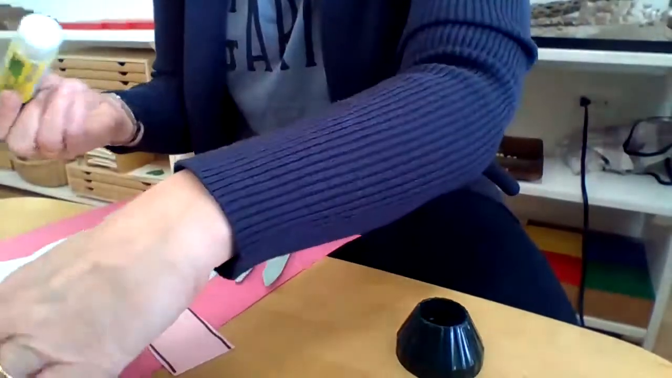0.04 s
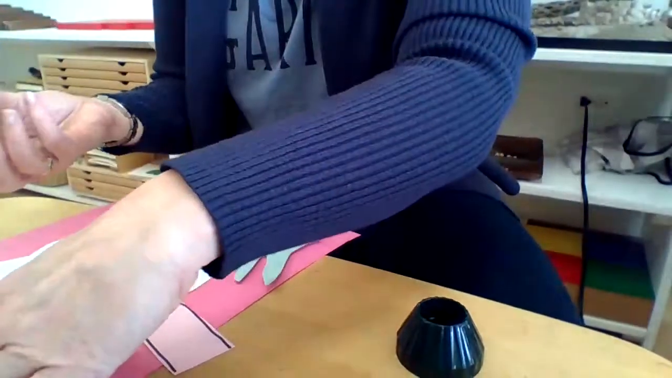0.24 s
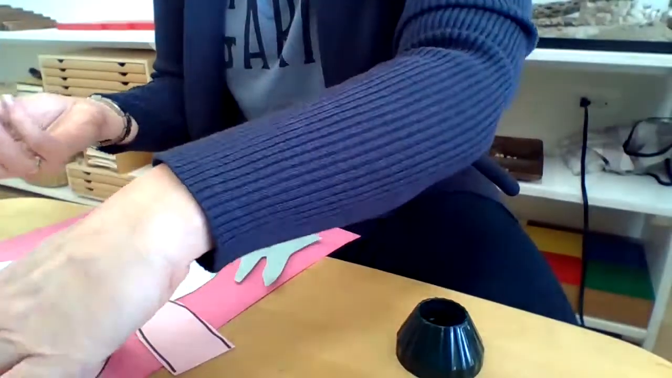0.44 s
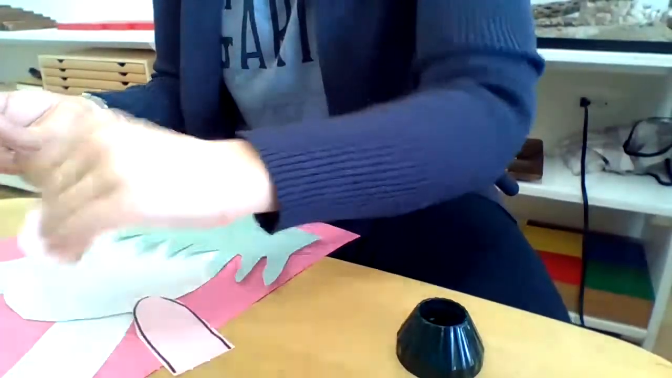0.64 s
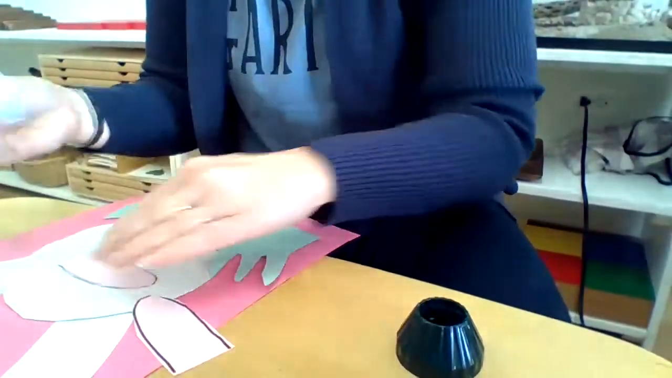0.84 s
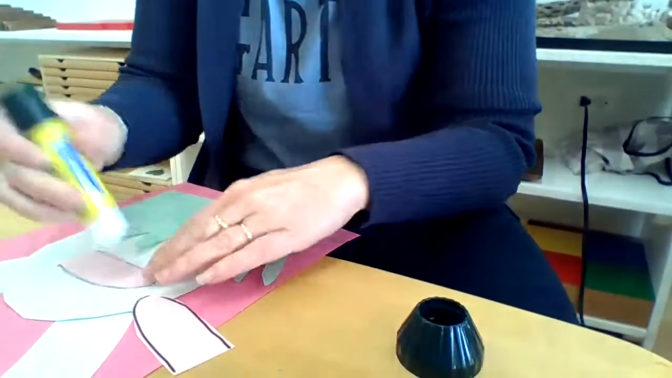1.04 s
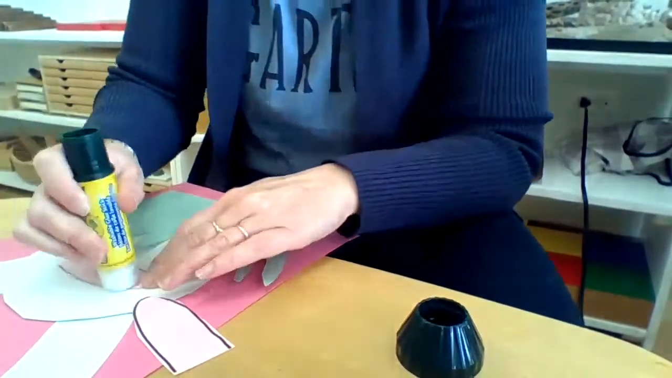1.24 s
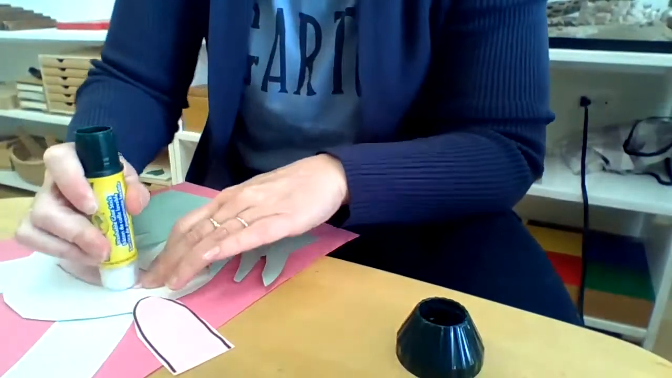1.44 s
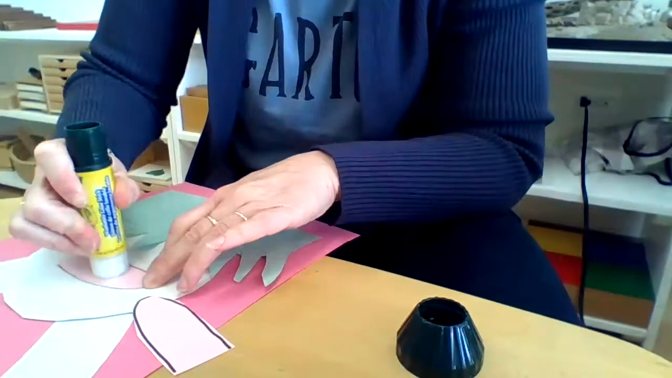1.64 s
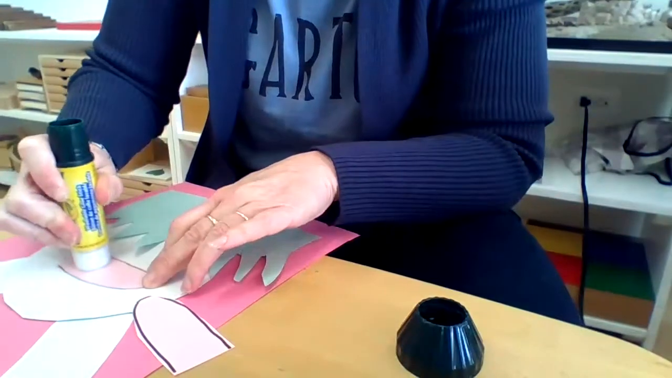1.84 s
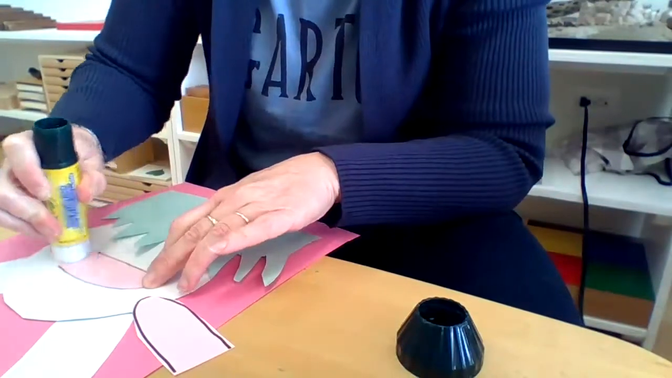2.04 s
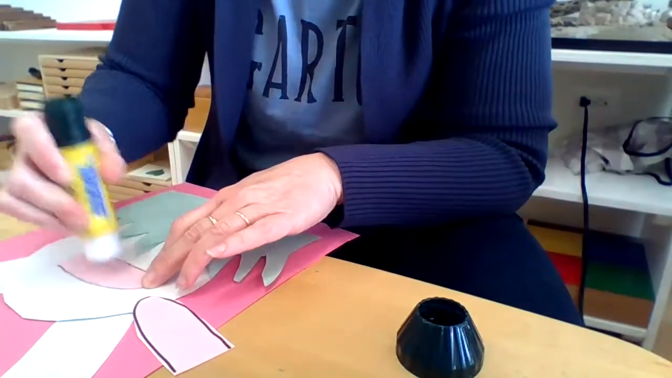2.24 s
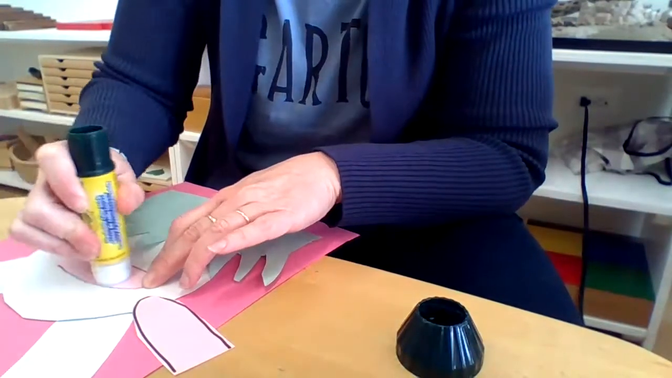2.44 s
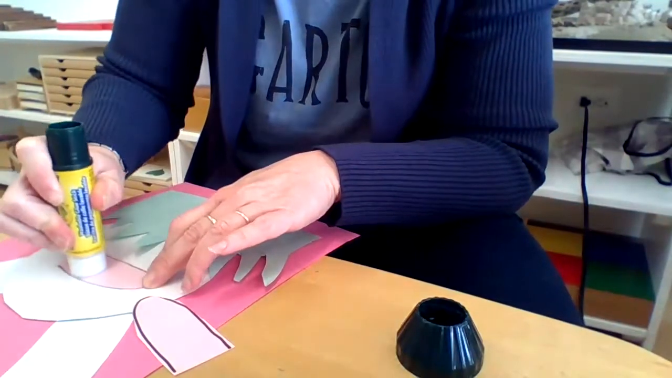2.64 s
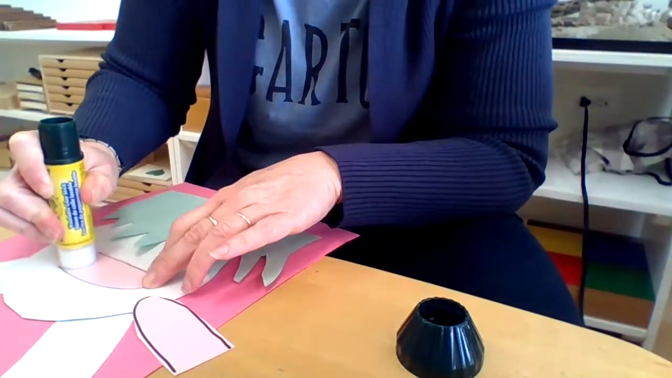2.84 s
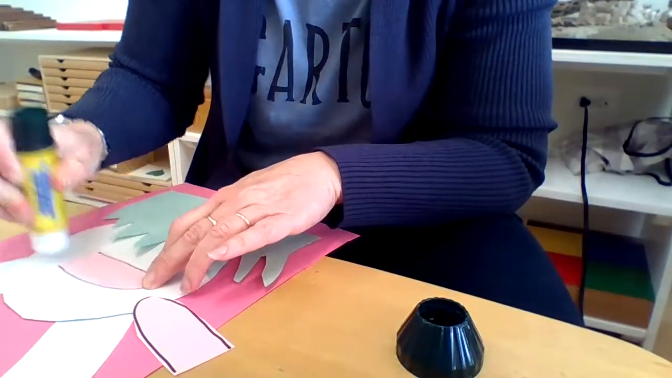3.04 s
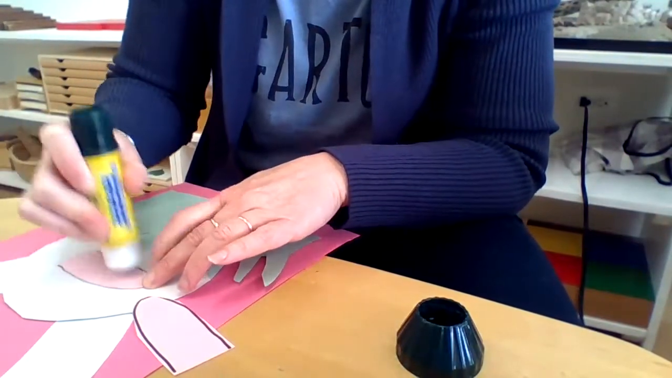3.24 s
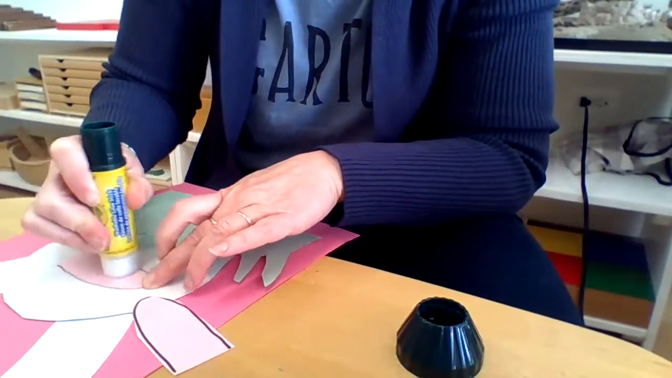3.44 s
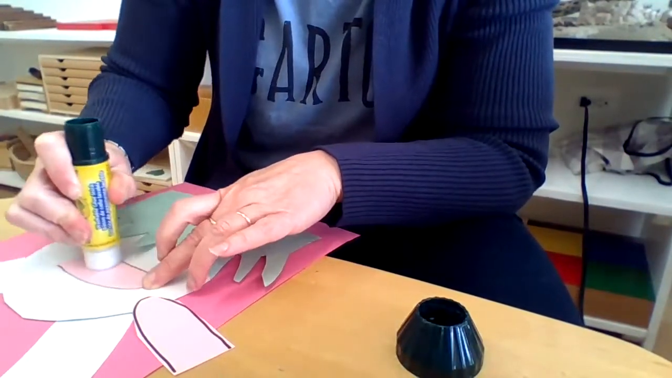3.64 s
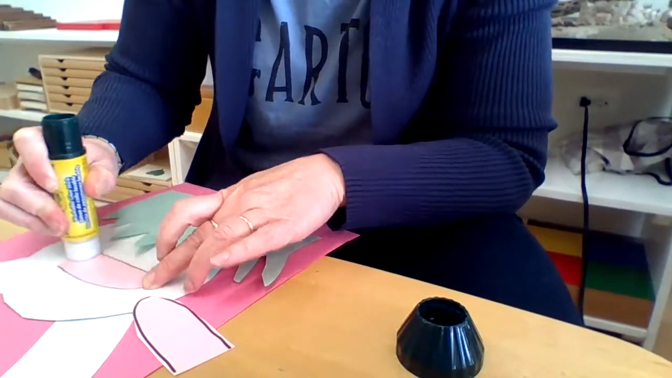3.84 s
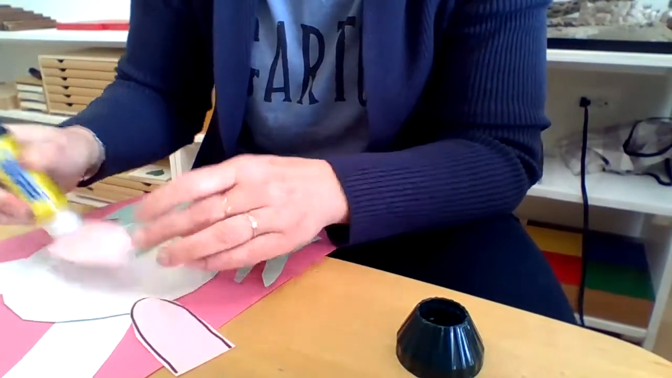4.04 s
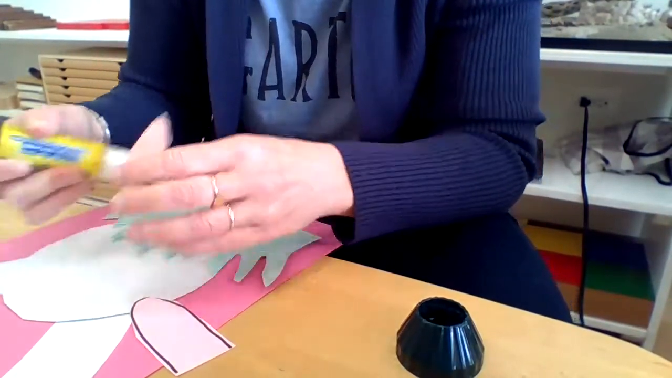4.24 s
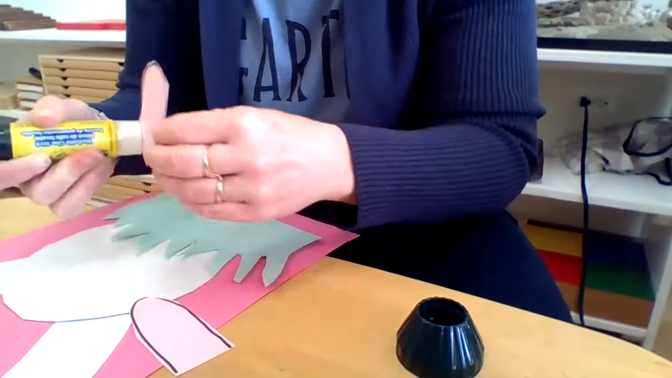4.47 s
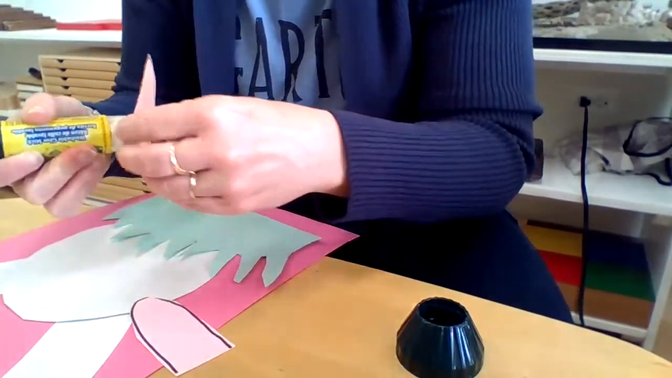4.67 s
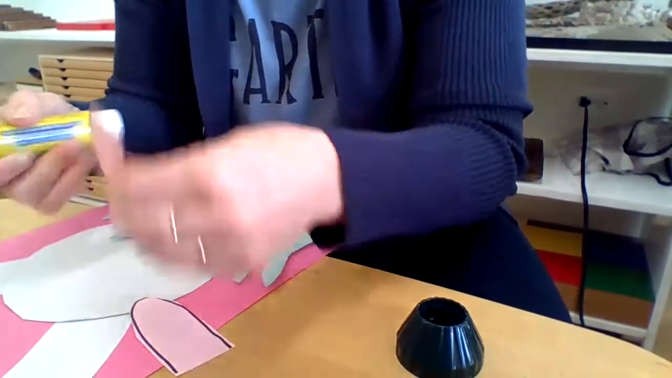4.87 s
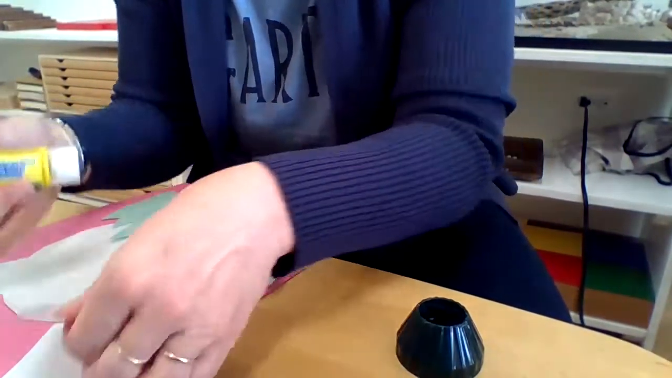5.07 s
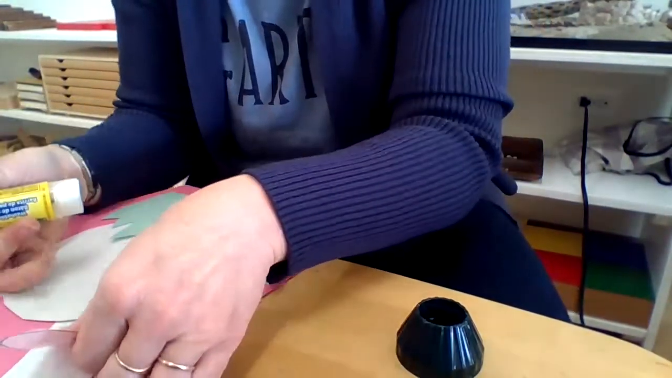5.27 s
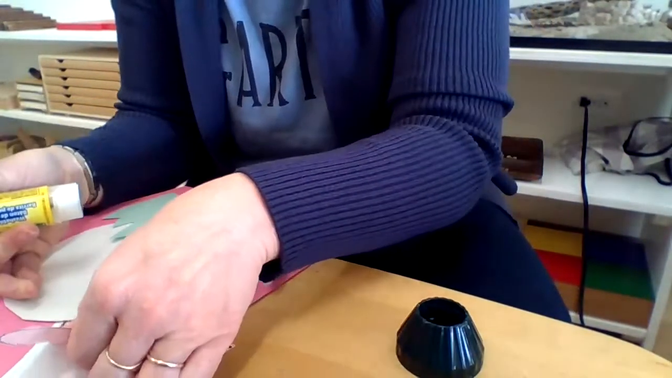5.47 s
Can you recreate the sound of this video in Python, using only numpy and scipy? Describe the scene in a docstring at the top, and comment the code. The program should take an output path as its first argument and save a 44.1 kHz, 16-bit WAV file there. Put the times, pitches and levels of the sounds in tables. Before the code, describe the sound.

Close up in a small, quiet room, paper rasps and ticks as a hand smooths it on a wooden table. Three sharp, briefly ringing knocks follow as a glue stick lands on the paper, with a few dull rubbing strokes after the first. A piece of paper snaps free, and faint slides and a soft bump finish. A low rumble and very faint electronic whine lie underneath.

```python
"""Glue stick on construction paper

A hand smooths paper on a wooden table, close up; slipping fibres shake the top, rasp and hiss.
The stick knocks three times, ringing the table's modes, and smears glue between soft bumps.
The paper ticks as it buckles; the glued piece snaps free and is pressed in place.
A small room, with a low rumble and a faint electronic whine."""
import sys
import numpy as np
from scipy import signal
from scipy.fft import rfft, irfft
from scipy.io import wavfile
from scipy.ndimage import uniform_filter1d

SR = 44100
rng = np.random.default_rng(int(sys.argv[2]) if len(sys.argv) > 2 else 0)


def log_audio(samples):
    """Write samples as a 16-bit WAV file to the path given in sys.argv[1]."""
    # one column per channel
    frames = np.atleast_2d(samples).T
    # limit to full scale, then quantise
    limited = np.clip(frames, -1, 1)
    pcm = np.round(limited * 32767).astype(np.int16)
    wavfile.write(sys.argv[1], SR, pcm)


N = 242991

# table-top modes: (frequency [Hz], level [dB], t60 [s])
TABLE_MODES = [(145.5, -21.5, 0.2), (213.3, -15.5, 0.22), (234, -37.5, 0.39), (262.5, -34, 0.38),
               (292, -22, .24), (326.3, -15, 0.22), (353, -30.5, .075), (425.6, -9, 0.11),
               (441.6, -17, 0.084), (543.2, -32, 0.22), (572.4, -21, .05), (636, -21, 0.1),
               (688.3, -7, 0.077), (765, -23, 0.066), (820, -33.5, 0.13), (1106, -33, .1),
               (1340, -27, 0.042), (1415, -15.5, 0.02), (1464, -29.5, .02), (2050, -14.5, 0.022),
               (2248, -18.5, 0.013), (2450, -39.5, 0.018)]


def knocks(touch_db=-17, touch_crack_db=-14, lead_s=0.002, baffle_hz=135):
    """Soft glue touches first, then the stick hits home with a crack; lighter bumps fall around these."""
    # stick landings: (time [s], blow [dB], contact [ms], crack [dB])
    landings = [(1.3132, -0.5, 1.47, -16), (2.4515, -0.53, 0.84, -13.5), (3.402, 0, 0.6, -13.5)]
    # soft bumps of stick and fingers: (time [s], blow [dB], contact [ms])
    bumps = [(.263, -23.5, 3.6), (1.446, -31, 0.72), (1.742, -33.5, 0.91), (2.133, -33, 0.54),
             (2.153, -31, 4.4), (3.059, -39.5, 1.06), (3.774, -35, 0.64), (3.858, -39, 0.96),
             (4.073, -29, 2.9), (5.289, -21, 3.23)]
    # crack spectrum: (frequency [Hz], relative level [dB])
    crack_spectrum = [(300, -30.5), (850, -1.5), (1150, -2), (1500, 11.5), (1850, -1.5), (2300, 3),
                      (2700, -7), (3200, -6), (4200, -13.5), (8000, -19), (12500, -19.5), (16000, -18.5)]
    out, modes = np.zeros(N), table_modes()
    for start_s, db, contact_ms, crack_db in landings:
        ring = gain_of(db) * blow(modes, contact_ms, baffle_hz)
        crack = gain_of(crack_db) * burst(lambda hz: curve_at(crack_spectrum, hz), decay_ms=1.5, spike=1.8)
        add(out, start_s - lead_s, -gain_of(touch_db) * ring)
        add(out, start_s - lead_s, gain_of(touch_crack_db) * crack)
        add(out, start_s, ring)
        add(out, start_s, crack)
    for start_s, db, contact_ms in bumps:
        low_cut_hz = 0.4 * 1000 / contact_ms  # modes under 0.4 cycle per contact barely move
        add(out, start_s, gain_of(db) * blow(modes, contact_ms, low_cut_hz))
    return highpass(out, baffle_hz)  # air slips round the board: deep bass does not radiate


def table_modes(rise_ms=0.87, travel_ms=0.48, size=20000):
    """Free ring of the table top, one row per mode."""
    hz, db, t60_s = np.transpose(TABLE_MODES)[:, :, None]
    arrival_ms = np.maximum(travel_ms * (np.sqrt(700 / hz) - 1), 0)  # low bending waves travel slower
    t = np.maximum(np.arange(size) / SR - arrival_ms / 1000, 0)
    rise = 1 - np.exp(-t * 1000 / rise_ms)
    return gain_of(db) * rise * np.sin(2 * np.pi * hz * t) * np.exp(-np.log(1000) * t / t60_s)


def blow(modes, contact_ms, low_cut_hz):
    """A long contact omits the high modes; a glancing touch omits the low ones."""
    contact_cycles = np.array(TABLE_MODES)[:, 0] * contact_ms / 1000
    drive = 1 / (1 + contact_cycles ** 4)
    return highpass(drive @ modes, low_cut_hz)


def glue_smears():
    """Glue over paper: weight shakes the table; hiss follows speed, rasp follows it steeply."""
    # stick strokes: (start [s], end [s], speed [dB], weight [dB])
    smears = [(1.44, 1.51, -7.5, -0.5), (1.546, 1.675, -6.5, -5.5), (1.743, 1.935, 0, -5.5),
              (2.104, 2.2, -7.5, -5), (2.618, 2.695, -22, -15.5), (4.006, 4.07, -11, -10)]
    # table murmur, sheet rasp and hiss spectra: (frequency [Hz], relative level [dB])
    murmur = [(80, -28), (150, 1.5), (220, 4.5), (330, -3), (430, 4.5), (560, -22.5), (640, -9), (695, 8.5),
              (760, -10.5), (900, -5.5), (1200, -50)]
    rasp = [(600, -20), (1000, -6), (1150, -8.5), (1420, 4.5), (1750, -7), (2150, 4.5), (2500, -6),
            (3000, -23), (4500, -26.5)]
    hiss = [(1500, -25.5), (3000, -5), (4000, -4.5), (5000, 0), (6300, -12), (7600, -8), (9500, -14),
            (12000, -8.5), (16000, -17)]
    tilt_db_per_oct = 0.5
    strokes = [(start_s, end_s, -47 + weight_db, -52 + 2.5 * speed_db, -66 + speed_db, tilt_db_per_oct)
               for start_s, end_s, speed_db, weight_db in smears]
    return friction(strokes, murmur, rasp, hiss,
                    slips_per_s=1700, spread_db=-1.5, steady=0.5, taper=0.49, patchy_db=0.5)


def hand_slides():
    """Hand and paper over paper: weight shakes the table, speed makes hiss, both make the sheet rasp."""
    # hand strokes: (start [s], end [s], speed [dB], weight [dB], hiss tilt [dB/octave])
    slides = [(0, 0.194, -19, -22.5, 3), (0.15, 0.268, -9, -0.5, 3), (0.248, 0.423, -21.5, -12, 0.5),
              (.42, 0.481, -8.5, -18.5, 4.5), (0.516, 0.579, -18, -11.5, 2), (0.561, .594, 0, -13.5, -0.5),
              (.594, .661, -3.5, -18, 1), (0.649, 0.94, -17.5, -21, 3), (4.098, 4.159, -22, -23, -7),
              (4.535, 4.598, -15.5, -22.5, -4), (4.878, 4.906, -11.5, -14, -2.5),
              (5.205, 5.307, -12.5, -17, -0.5), (5.301, 5.413, -13, -20.5, -.5),
              (5.388, 5.494, -22.5, -25, -3)]
    # table murmur, sheet rasp and hiss spectra: (frequency [Hz], relative level [dB])
    murmur = [(80, -36), (135, -1), (210, -2.5), (330, -6), (450, -4.5), (560, -14), (720, -11.5),
              (950, -16.5), (1300, -62.5)]
    rasp = [(600, -14), (1000, -7.5), (1400, 8), (1800, -3.5), (2200, 2.5), (3000, -14), (4500, -53)]
    hiss = [(1500, -39), (3000, 3.5), (4500, 7), (6500, 6.5), (9000, 2), (13000, 3.5), (16000, -3)]
    strokes = []
    for start_s, end_s, speed_db, weight_db, tilt_db_per_oct in slides:
        rasp_db = -45.5 + 0.8 * speed_db + 0.48 * weight_db
        strokes.append((start_s, end_s, -44 + weight_db, rasp_db, -45 + speed_db, tilt_db_per_oct))
    return friction(strokes, murmur, rasp, hiss,
                    slips_per_s=2400, spread_db=2.5, steady=0.24, taper=0.51, patchy_db=3.5)


def friction(strokes, murmur, rasp, hiss, slips_per_s, spread_db, steady, taper, patchy_db, size=16384):
    """Fibres catch and slip under each stroke: they shake the table, rasp in the sheet, hiss in air."""
    out = np.zeros(N)
    for start_s, end_s, murmur_db, rasp_db, hiss_db, tilt_db_per_oct in strokes:
        slip_db = spread_db * np.minimum(rng.exponential(1, size), 4)
        kicks = gain_of(slip_db) * rng.choice([-1, 1], size)
        slipping = rng.random(size) < slips_per_s / SR
        slips = unit_rms(kicks * slipping) + steady * rng.standard_normal(size)
        flexed = sheet_flex(slips, patchy_db)
        tilted_hiss = [(hz, db + tilt_db_per_oct * np.log2(hz)) for hz, db in hiss]
        paths = [(murmur_db, coloured(slips, murmur)),
                 (rasp_db, coloured(flexed, rasp)),
                 (hiss_db, coloured(flexed, tilted_hiss))]
        length = min(round((end_s - start_s) * SR), size)
        swell = np.sin(np.linspace(0, np.pi, length)).clip(0) ** taper
        add(out, start_s, swell * sum(gain_of(db) * unit_rms(path[:length]) for db, path in paths))
    return out


def sheet_flex(x, patchy_db):
    """The sheet flexes under the stroke, so its colour shifts in patches."""
    spectra = signal.stft(x, SR, nperseg=256)[2]
    patches = uniform_filter1d(rng.standard_normal(spectra.shape), size=6, axis=0)
    patches = uniform_filter1d(patches, size=8, axis=1)
    return signal.istft(spectra * gain_of(patchy_db * unit_rms(patches)), SR)[1][:len(x)]


def paper_snaps(decay_cycles=2.5):
    """Stiff paper buckles or comes unstuck in single ticks; low ones last longer."""
    # ticks: (time [s], level [dB], centre [Hz], width [octaves])
    ticks = [(0.053, -42, 1690, 0.75), (.417, -37, 4000, 5.6), (.4609, -30, 2640, 0.5),
             (0.525, -45, 1850, 1.3), (0.6604, -30.5, 1030, 0.57), (0.827, -33, 2480, 12),
             (.870, -37.5, 1680, 2.6), (.994, -40, 2960, 3.4), (1.166, -42, 1106, 0.87),
             (3.0603, -44, 1990, 0.38), (4.0551, -19.5, 2680, 2.2), (4.103, -35.5, 2470, 1.5),
             (4.775, -46, 3000, 1.3), (4.889, -34, 4000, 3), (5.212, -45, 1340, 0.64),
             (5.465, -50.5, 1090, 1.11)]
    out = np.zeros(N)
    for start_s, db, centre_hz, width_oct in ticks:
        colour_db = lambda hz: -20 * np.log10(1 + (np.log2((hz + 1) / centre_hz) / width_oct) ** 2)
        decay_ms = decay_cycles * 1000 / centre_hz
        add(out, start_s, gain_of(db) * burst(colour_db, decay_ms, spike=4))
    return out


def burst(colour_db, decay_ms, spike, size=2048):
    """A sharp click and its dying scatter, coloured by a causal filter."""
    t = np.arange(size) / SR
    fade = np.exp(-t * 1000 / decay_ms)
    kick = rng.standard_normal(size) * fade
    kick[0] += spike
    spectrum = np.fft.fft(kick)
    ripple = np.sqrt(uniform_filter1d(abs(spectrum) ** 2, size=15, mode="wrap"))
    hz = abs(np.fft.fftfreq(size, 1 / SR))
    log_gain = np.log(gain_of(np.maximum(colour_db(hz), -70)) / ripple)  # leaves the object's own colour
    minimum_phase = np.exp(np.conj(signal.hilbert(log_gain)))
    click = np.fft.ifft(spectrum * minimum_phase).real
    return click * np.linalg.norm(fade) / np.linalg.norm(click) / 2


def near_echoes(x, echo_db=-13, decay_s=0.012, low_cut_hz=900, taps_per_s=1500):
    """Hands, body and shelves scatter the treble back within a few hundredths of a second."""
    t = np.arange(SR // 10) / SR
    taps = rng.standard_normal(len(t)) * (rng.random(len(t)) < taps_per_s / SR)
    taps *= (t > 0.002) * np.exp(-t / decay_s)
    treble = highpass(x, low_cut_hz)
    return gain_of(echo_db) * signal.fftconvolve(treble, taps / np.linalg.norm(taps))[:N]


def room(x, wet_db=-21, first_s=0.005, taps_per_s=4000):
    """Sparse reflections of random sign, each band dying at its own rate."""
    # room decay: (frequency [Hz], t60 [s])
    decay_times = [(150, 0.99), (400, 1), (1000, 0.52), (2500, 0.64), (6000, 0.2), (15000, 0.17)]
    # tail spectrum: (frequency [Hz], relative level [dB])
    tail_colour = [(150, -8.5), (400, -18), (700, -13.5), (1000, 10), (1400, 3.5), (2200, 0), (3500, 4),
                   (6000, 0.5), (15000, -16.5)]
    taps = rng.choice([-1., 1.], SR) * (rng.random(SR) < taps_per_s / SR)
    taps *= np.arange(SR) / SR > first_s
    hz, t, spectra = signal.stft(taps, SR, nperseg=256)
    fade = np.exp(-np.log(1000) * t / curve_at(decay_times, hz)[:, None])
    tail = signal.istft(spectra * fade * gain_of(curve_at(tail_colour, hz))[:, None], SR)[1]
    return gain_of(wet_db) * signal.fftconvolve(x, tail / np.linalg.norm(tail))[:N]


def background(floor_db=-53.5, waver_hz=3.1):
    """Room rumble, microphone hiss and a thin, slightly unsteady electronic whine."""
    # rumble and hiss spectrum: (frequency [Hz], relative level [dB])
    floor_spectrum = [(8.8, -42.5), (15, 7), (27, -0.5), (43, -9), (86, -11), (206, -19), (276, -22),
                      (606, -28.5), (743, -33.5), (1680, -37.5), (2520, -39.5), (2830, -36), (3180, -41),
                      (14100, -41), (15800, -37)]
    # whine tones: (frequency [Hz], rms level [dB])
    tones = [(2904.5, -78), (5098, -90.5), (5750, -88.5), (8000, -86), (13096, -80.5)]
    drift_hz = waver_hz * coloured(rng.standard_normal(N), [(2, 0), (20, -20), (60, -80)])
    whine = sum(gain_of(db) * np.sqrt(2) * np.sin(2 * np.pi * np.cumsum(hz + drift_hz) / SR)
                for hz, db in tones)
    return gain_of(floor_db) * coloured(rng.standard_normal(N), floor_spectrum) + whine


def gain_of(db):
    """Decibels to amplitude."""
    return 10 ** (np.asarray(db) / 20)


def unit_rms(x):
    """Scales to rms 1."""
    return x / np.sqrt(np.mean(x ** 2) + 1e-20)


def curve_at(points, hz):
    """Linear interpolation on a log-frequency axis."""
    point_hz, values = np.transpose(points)
    return np.interp(np.log(hz + 1), np.log(point_hz + 1), values)


def coloured(x, spectrum):
    """Filters x by a spectrum, to rms 1."""
    hz = np.fft.rfftfreq(len(x), 1 / SR)
    return unit_rms(irfft(rfft(x) * gain_of(curve_at(spectrum, hz)), len(x)))


def highpass(x, cut_hz):
    """Second-order Butterworth high-pass."""
    return signal.sosfilt(signal.butter(2, cut_hz, "high", fs=SR, output="sos"), x)


def add(mix, start_s, sound):
    """Mixes a sound in at start_s."""
    part = mix[max(round(start_s * SR), 0):][:len(sound)]
    part += sound[:len(part)]


def scene():
    """All the handling on the table, in the room; mono."""
    direct = hand_slides() + glue_smears() + knocks() + paper_snaps()
    return (direct + near_echoes(direct) + room(direct) + background())[None]


def record(dry):
    """Band limit at 16.05 kHz."""
    lowpass_taps = signal.firwin(511, 16050, window=("kaiser", 9), fs=SR)
    return signal.oaconvolve(dry, lowpass_taps[None], "same")


dry = scene()
out = record(dry)
log_audio(out)
```